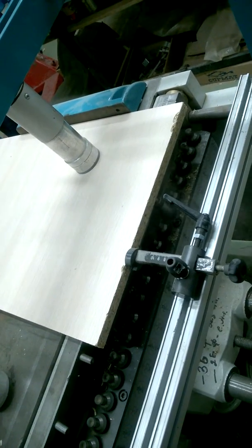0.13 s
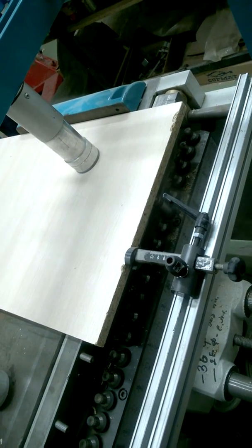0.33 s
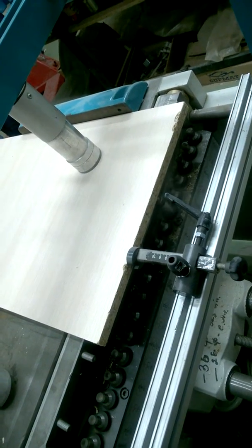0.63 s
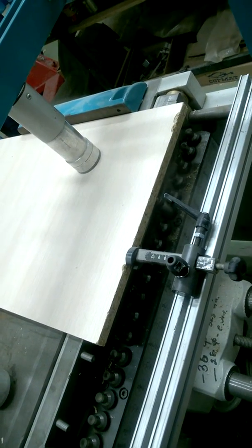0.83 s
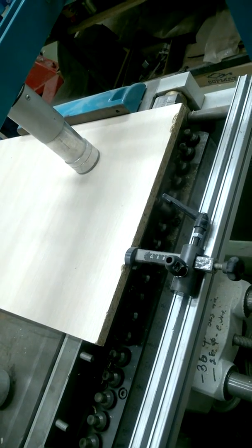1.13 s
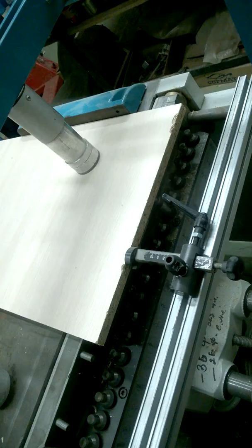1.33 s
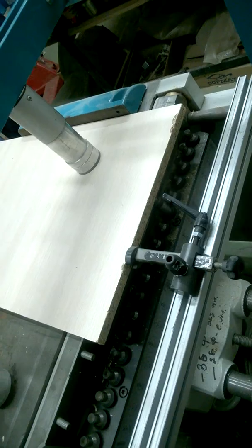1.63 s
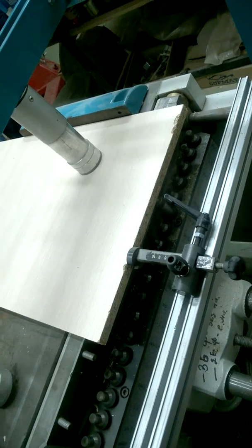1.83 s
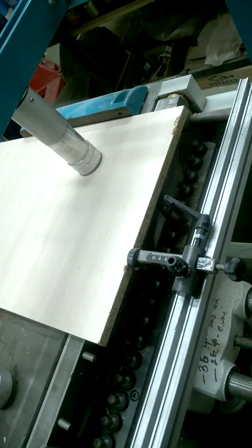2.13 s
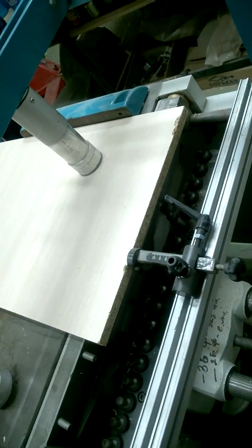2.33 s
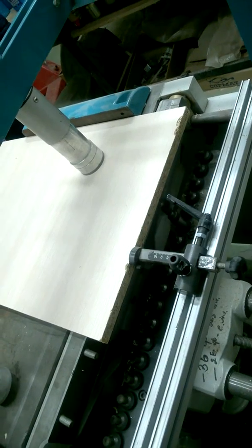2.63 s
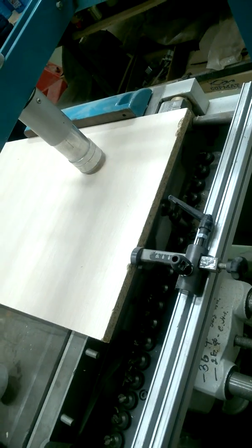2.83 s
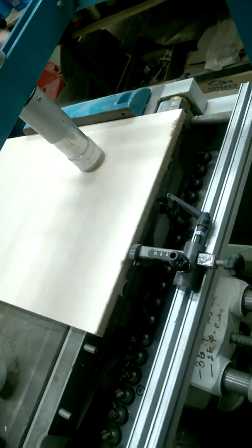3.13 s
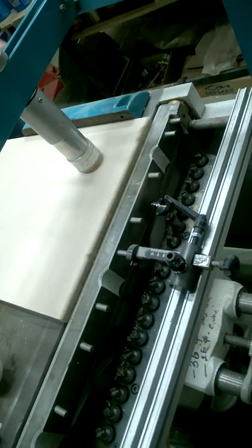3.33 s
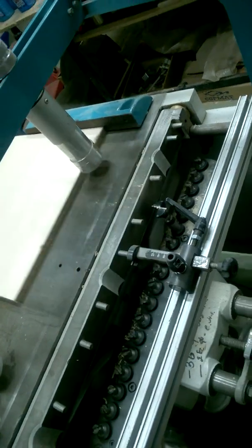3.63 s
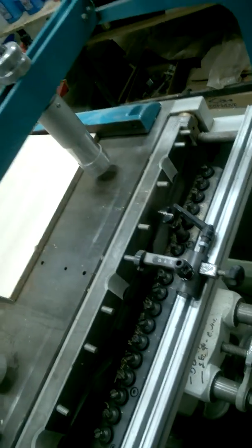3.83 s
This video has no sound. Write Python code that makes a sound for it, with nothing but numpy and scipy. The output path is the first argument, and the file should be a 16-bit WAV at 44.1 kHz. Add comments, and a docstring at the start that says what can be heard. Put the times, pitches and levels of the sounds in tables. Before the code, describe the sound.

A boring machine whines and rattles, then hisses out air as a board scrapes away.

```python
"""A humming motor and singing, rattling gears: a multi-spindle boring machine, close up in a workshop.
The spindles whine as the drills enter a board, and one drill rubs with a thin squeal. A valve vents
the feed cylinder; air hisses while the spindles stop and the carriage rumbles back. The board slides
off the steel table, scraping and bumping, and a last small puff of air escapes.
One microphone, the same on both channels."""
import sys
import numpy as np
from scipy import signal
from scipy.fft import rfft, irfft
from scipy.io import wavfile

SR = 44100
rng = np.random.default_rng(int(sys.argv[2]) if len(sys.argv) > 2 else 0)


def int16_out(signal):
    """Quantize to a 16-bit WAV file."""
    q = np.round(np.clip(np.atleast_2d(signal).T, -1, 1) * 32767)
    wavfile.write(sys.argv[1], SR, q.astype(np.int16))


N = 176400
T = np.arange(N) / SR
SHAFT_HZ = 49.46

# Air leaving the cylinder. Each row: frequency in Hz, relative level in dB.
EXHAUST_SPECTRUM = [(100, -12), (350, -9), (600, -9.5), (1050, -8), (1400, -1), (1650, -4.5), (1950, 1.5),
                    (2250, -1.5), (2600, -0.5), (3200, -3), (3750, -2), (4700, -7), (6000, -7),
                    (9000, -17.5), (11500, -16), (15800, -20.5)]
# The board's heavy drag on the table. Each row: frequency in Hz, relative level in dB.
DRAG_SPECTRUM = [(50, -20), (90, -5), (135, 0.5), (220, -2), (420, 3.5), (700, -6), (1400, -11.5),
                 (3000, -28.5), (7000, -40.5), (15000, -60)]


def machine():
    """The motor hums and drives the gears, which die away after the stroke."""
    # Each row: time in seconds, level of the hum in dB.
    hum_levels = [(0, -23.5), (.9, -26), (1.75, -28), (2.3, -50), (2.75, -40), (3.0, -46.5), (3.2, -50.5),
                  (4, -58)]
    stop_s, stop_db_per_s = 1.818, 113
    turns = np.cumsum(SHAFT_HZ * (1 + .0005 * walk(3.12))) / SR
    running = undb(-stop_db_per_s * np.maximum(T - stop_s, 0))
    hum = curve(hum_levels) * np.sin(2 * np.pi * turns)
    return (gear_tones(turns) + gear_rattle(turns)) * running + hum


def gear_tones(turns):
    """Shaft harmonics and spindle whine, whose balance shifts as the drills bite."""
    # Each row: multiple of the shaft rate, relative dB running free, relative dB while boring.
    harmonics = [(2, -45, -47), (4, -41, -48), (5, -51, -57), (6, -46, -49), (7, -52, -50), (8, -38, -42),
                 (10, -51, -49), (11, -46, -52), (12, -44, -63), (13, -47, -52), (14, -40, -36),
                 (15, -45, -41), (18, -36, -47), (19, -35, -36), (20, -35, -36), (21, -36, -34),
                 (22, -36, -41), (24, -40, -47), (25, -35, -43), (27, -37, -52), (28, -43, -41),
                 (29, -41, -42), (30, -28, -40), (31, -39, -47), (32, -41, -52), (35, -42, -62),
                 (36, -42, -48), (39, -42, -43), (40, -39, -54), (42, -40, -40), (43, -33, -56),
                 (44, -31, -42), (45, -40, -45), (46, -42, -57), (47, -47, -42), (48, -39, -52),
                 (50, -36, -51), (51, -41, -38), (52, -34, -45), (53, -41, -41), (55, -44, -43),
                 (57, -40, -42), (59, -43, -57), (65, -40, -50), (70, -43, -60), (71, -41, -61),
                 (73, -42, -55), (79, -43, -62), (85, -42, -51)]
    # Each row: frequency of a whine in Hz, relative dB running free, relative dB while boring.
    whines = [(957.5, -46, -30.5), (1501.5, -44, -29), (1551, -52, -36), (2342, -52, -40), (2606, -52, -40),
              (2902, -50, -42)]
    flicker_db, jitter_rad, settle_db_per_s = 1.5, .22, 10.5
    load = ramp(at=1.1, span=.22)
    throb = 1 + .4 * np.cos(2 * np.pi * turns)  # the whine swells once a turn
    lines = [(k * SHAFT_HZ, free, boring, 1) for k, free, boring in harmonics]
    lines += [(hz, free, boring, throb) for hz, free, boring in whines]
    tones = 0
    for hz, free_db, boring_db, swell in lines:
        # the high free-running tones fade as the feed advances
        settle_db = settle_db_per_s * (hz > 2000) * (.39 - T)
        gain = undb(free_db + settle_db) * (1 - load) + undb(boring_db) * load
        phase = 2 * np.pi * (turns * hz / SHAFT_HZ + rng.random()) + jitter_rad * walk(25)
        tones += gain * swell * undb(flicker_db * walk(6.5)) * np.sin(phase)
    return tones * undb(3)


def gear_rattle(turns):
    """Dense tooth impacts in the gearbox throb with the shaft; part of the clatter repeats every turn."""
    # Each row: frequency in Hz, relative level in dB.
    gearbox_spectrum = [(25, -16), (70, -17.5), (160, -21.5), (280, -15), (450, -17.5), (720, -8),
                        (830, -10), (1020, -5.5), (1180, -8.5), (1480, -4), (1720, -6.5), (2080, 1),
                        (2300, -4), (2700, -1.5), (3200, -5.5), (3750, -4.5), (4700, -10.5), (6000, -12.5),
                        (7500, -16.5), (9500, -25.5), (11500, -21), (13500, -25.5), (15800, -32)]
    turn_samples = int(SR / SHAFT_HZ)
    repeating = rng.standard_normal(turn_samples)[(turns % 1 * turn_samples).astype(int)]
    throb = unit(sum(np.cos(2 * np.pi * (k * turns + rng.random())) for k in range(1, 6)))
    teeth = (noise() + .29 * repeating) * np.exp(.079 * throb + .084 * walk(414))
    level_db = -22 + 4 * np.exp(-T / .8)  # a little louder at first
    return colour(room(teeth), gearbox_spectrum) * undb(level_db)


def drill_squeal():
    """A rubbing drill: friction keeps one narrow resonance ringing, thin and rough."""
    # Each row: time in seconds, level in dB.
    levels = [(0, -50), (.55, -48), (.62, -27), (.85, -37), (1.0, -39), (1.55, -36.5), (1.8, -44),
              (2.1, -110)]
    pitch_hz, width_hz = 3590, 24
    phase = 2 * np.pi * pitch_hz * T
    return curve(levels) * unit(walk(width_hz) * np.cos(phase) + walk(width_hz) * np.sin(phase))


def venting_air():
    """The valve's blast, the long hiss of the emptying cylinder and a last puff."""
    # Each row of both: frequency in Hz, relative level in dB.
    blast_spectrum = [(30, -13), (70, -15), (130, -9), (250, 4), (500, 1.5), (900, -3), (2000, -5),
                      (4000, -12), (6000, -11.5), (9000, -20), (11500, -13), (15800, -25)]
    puff_spectrum = [(500, -22), (1500, 14), (3000, 4), (4500, 2), (6500, -4), (9000, -19), (11000, -5),
                     (13000, -10), (15800, -20)]
    # Each row: time in seconds, level of the hiss in dB before it darkens.
    flow_levels = [(1.78, -64), (1.85, -24), (2.2, -26), (2.42, -28), (2.52, -30), (2.59, -28.5),
                   (2.7, -32.5), (2.78, -39.5), (2.86, -50), (2.97, -60), (3.1, -80)]
    blast = colour(rough_noise(.18, 300), blast_spectrum)
    blast *= burst(1.788, attack=.035, hold=.035, db_per_s=53)
    hiss = colour(rough_noise(.081, 200), EXHAUST_SPECTRUM)
    treble = signal.sosfiltfilt(signal.butter(2, 4600, "high", fs=SR, output="sos"), hiss)
    treble_gain = undb(-12.5 * ramp(at=2.46, span=.17))  # the hiss darkens as the pressure falls
    hiss += treble * (treble_gain - 1)
    puff = colour(noise(), puff_spectrum) * puff_envelope()
    return undb(-20.5) * blast + hiss * curve(flow_levels) + undb(-46.5) * puff


def puff_envelope():
    """The quick rise and fall of the last puff of air."""
    return burst(3.807, attack=.016, hold=.016, db_per_s=172)


def splutter():
    """The emptying cylinder spits in the dying hiss."""
    # Each row: start in seconds, level in dB.
    spits = [(2.462, -39), (2.505, -29), (2.552, -28), (2.59, -32), (2.65, -34.5), (2.688, -36)]
    envelope = sum(undb(db) * burst(at, attack=.002, db_per_s=550) for at, db in spits)
    return colour(noise(), EXHAUST_SPECTRUM) * envelope


def valve_sizzle():
    """The thin jet at the valve mouth shuts off abruptly, leaks a little and spits with the last puff."""
    # Each row of both: frequency in Hz, relative level in dB.
    jet_spectrum = [(3000, -26), (6000, 5), (9000, -10.5), (11500, -3), (13500, -1), (15800, -10.5)]
    leak_spectrum = [(5000, -15), (9000, -14), (10800, 2.5), (12800, 0), (14500, -12), (15800, -27.5)]
    # Each row of both: time in seconds, level in dB.
    jet_levels = [(1.795, -70), (1.82, -29), (2.0, -48), (2.35, -45), (2.5, -47), (2.66, -52), (2.76, -56),
                  (2.91, -58.5), (3.0, -95)]
    leak_levels = [(3.35, -100), (3.4, -69), (3.445, -75), (3.49, -68), (3.6, -74), (3.66, -67),
                   (3.74, -70), (3.78, -100)]
    jet = colour(rough_noise(.2, 200), jet_spectrum) * curve(jet_levels)
    spit = undb(-66) * puff_envelope()
    return jet + colour(noise(), leak_spectrum) * (curve(leak_levels) + spit)


def return_stroke():
    """The valve knocks; then the carriage rumbles back, its jolts thudding and swaying the frame."""
    # The valve's knock, then the carriage's jolts. Each row: start in seconds, sway in dB, thud in dB.
    impacts = [(1.795, -41, -26.5), (2.101, -24, -37), (2.196, -22, -35.5), (2.304, -21, -27),
               (2.39, -21.5, -29)]
    # Each row of both: frequency in Hz, relative level in dB.
    thud_spectrum = [(40, -14), (105, 6.5), (160, -2.5), (270, -1.5), (400, -5.5), (700, -14), (2000, -30),
                     (6000, -61)]
    rumble_spectrum = [(22, -42), (30, -19), (38, 5), (48, -4.5), (65, -23), (105, -13.5), (160, -14),
                       (250, -18), (400, -18.5), (700, -28), (1500, -48.5), (4000, -72)]
    # Each row: time in seconds, level in dB.
    rumble_levels = [(1.77, -55), (1.82, -34), (2.0, -29.5), (2.08, -30.5), (2.22, -30.5), (2.27, -30.5),
                     (2.33, -24), (2.43, -30), (2.49, -38), (2.65, -47), (2.78, -44), (3.0, -57)]
    frame_hz, attack_s = 38.9, .012
    sway = thud_envelope = 0
    for at, sway_db, thud_db in impacts:
        swing = np.sin(2 * np.pi * frame_hz * (T - at))
        sway += undb(sway_db) * burst(at, attack_s, db_per_s=130) * swing
        thud_envelope += undb(thud_db) * burst(at, attack_s, db_per_s=132)
    thuds = thud_envelope * colour(noise(), thud_spectrum)
    rumble = colour(rough_noise(.068, 40), rumble_spectrum) * curve(rumble_levels)
    return sway + thuds + rumble


def board_slide():
    """Uneven friction rings the sliding board, which bumps on its way out."""
    # Each row of both: frequency in Hz, relative level in dB.
    scrape_spectrum = [(60, -16.5), (130, -20.5), (350, -18), (700, 5.5), (1300, -0.5), (2300, -0.5),
                       (3000, -8.5), (4500, -14), (6500, -21.5), (9000, -31), (12000, -35), (15800, -52.5)]
    bump_spectrum = [(100, -22), (300, -17), (600, 2), (770, -9), (960, 6.5), (1400, -5), (2000, -5.5),
                     (3000, -23), (8000, -46), (15000, -60)]
    # Each row: time in seconds, level of the low drag in dB, level of the lighter scrape in dB.
    slide_levels = [(3.0, -71, -87.5), (3.09, -61.5, -74), (3.17, -44.5, -58), (3.23, -46.5, -60),
                    (3.32, -38.5, -55), (3.42, -48, -48.5), (3.56, -48.5, -42), (3.68, -68, -42),
                    (3.76, -52, -45.5), (3.8, -52, -51.5), (3.88, -64, -50), (3.94, -80, -59),
                    (4, -68, -61)]
    # Each row: time of the peak in seconds, level in dB, half-width in seconds.
    bumps = [(3.643, -29.5, 0.011), (3.83, -44, .012)]
    scrape = unit(colour(friction(), scrape_spectrum) + undb(.5) * board_ring(friction()))
    bump_envelope = sum(undb(db) * np.exp(-np.abs((T - at) / width) ** 1.3) for at, db, width in bumps)
    bump = colour(noise(), bump_spectrum) + undb(-14) * board_ring(noise())
    drag = colour(friction(), DRAG_SPECTRUM)
    return drag * curve(slide_levels) + scrape * curve(slide_levels, column=2) + bump * bump_envelope


def friction():
    """The board's grip on the steel: a fine grain with a slower unevenness."""
    return noise() * np.exp(.18 * walk(250) + .15 * walk(25))


def board_ring(force):
    """A force rings the board's resonances; rms 1."""
    # Each row: frequency in Hz, width in Hz, relative level in dB.
    modes = [(281, 21, 4.5), (608, 50, -4), (960, 29, -3.5), (1040, 71, -8.5), (1220, 44, 0.5),
             (1430, 60, -4), (1790, 110, -11), (2070, 70, -11.5), (2400, 120, -14)]
    f = np.maximum(np.fft.rfftfreq(N, 1 / SR), 1)
    response = sum((-1) ** k * undb(db) / (1 + 1j * (f * f - hz * hz) / (f * width))
                   for k, (hz, width, db) in enumerate(modes))
    return unit(irfft(rfft(force) * response, N))


def board_groan():
    """The sliding board groans at its lowest mode, wavering in pitch and level."""
    # Each row: time in seconds, level in dB.
    levels = [(3.1, -75), (3.26, -46), (3.4, -50), (3.56, -52), (3.7, -55), (3.78, -47), (3.87, -42),
              (3.93, -64), (4, -72)]
    pitch_hz = 264 * (1 + .023 * walk(30))
    phase = 2 * np.pi * np.cumsum(pitch_hz) / SR
    return curve(levels) * undb(2.5 * walk(30)) * np.sin(phase)


def edge_knocks():
    """The board's edge knocks along the table."""
    # Each row: start in seconds, level in dB.
    knocks = [(3.165, -44.5), (3.27, -60), (3.302, -47), (3.335, -49), (3.388, -47)]
    envelope = sum(undb(db) * burst(at, attack=.0018, db_per_s=450) for at, db in knocks)
    return envelope * unit(board_ring(noise()) + colour(noise(), DRAG_SPECTRUM))


def room_tone():
    """The workshop's steady, low background."""
    # Each row: frequency in Hz, relative level in dB.
    spectrum = [(25, -3.5), (45, 7.5), (80, -10), (250, -9.5), (500, -18.5), (900, -24), (1600, -22.5),
                (3000, -30), (6000, -29), (9500, -46.5), (13000, -50), (15800, -55.5)]
    return undb(-56.5) * colour(noise(), spectrum)


def room(x):
    """Short reflections from the machine bed and the workshop join the direct sound."""
    t60_s, wet = .26, undb(-8.5)
    tail = noise() * undb(-60 * T / t60_s) * (T > .003)
    reflections = signal.fftconvolve(x, tail / np.linalg.norm(tail))[:N]
    return (x + wet * reflections) / np.hypot(1, wet)


def undb(db):
    """Decibels to gain."""
    return 10 ** (np.asarray(db) / 20)


def unit(x):
    """Scale to rms 1."""
    return x / np.sqrt(np.mean(x ** 2))


def noise():
    """White noise."""
    return rng.standard_normal(N)


def walk(rate_hz):
    """Smooth random wander up to about the given rate; rms 1."""
    f = np.fft.rfftfreq(N, 1 / SR)
    return unit(irfft(rfft(noise()) * np.exp(-(f / rate_hz) ** 2) * (f > 0), N))


def rough_noise(depth, rate_hz):
    """White noise whose level flutters at random."""
    return noise() * np.exp(depth * walk(rate_hz))


def curve(rows, column=1):
    """Gain over time from rows of seconds and dB."""
    rows = np.array(rows)
    return undb(np.interp(T, rows[:, 0], rows[:, column]))


def colour(x, spectrum):
    """Filter by rows of Hz and dB, rolling off below the first; rms 1."""
    hz, db = np.array(spectrum).T
    f = np.maximum(np.fft.rfftfreq(N, 1 / SR), 1)
    gain = undb(np.interp(np.log(f), np.log(hz), db))
    low_cut = np.minimum(f / hz[0], 1) ** 2
    return unit(irfft(rfft(x) * gain * low_cut, N))


def ramp(at, span):
    """A smooth step from 0 to 1; centre and span in seconds."""
    return .5 + .5 * np.tanh(2 * (T - at) / span)


def burst(start, attack, db_per_s, hold=0):
    """A linear attack, a hold and a steady fall in dB; times in seconds."""
    rise = np.clip((T - start) / attack, 0, 1)
    return rise * undb(-db_per_s * np.maximum(T - start - attack - hold, 0))


def scene():
    """Everything reaches one microphone close to the machine."""
    mono = machine() + room(venting_air() + splutter() + valve_sizzle() + board_slide())
    mono += board_groan() + edge_knocks() + return_stroke() + room_tone() + drill_squeal()
    return np.array([mono, mono])


def record(dry):
    """The recorder cuts the top steeply."""
    top_hz = 15800
    return signal.sosfilt(signal.ellip(12, .1, 90, top_hz, fs=SR, output="sos"), dry)


dry = scene()
out = record(dry)
int16_out(out)
```